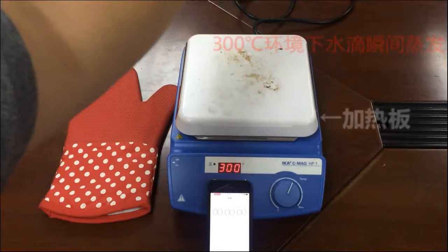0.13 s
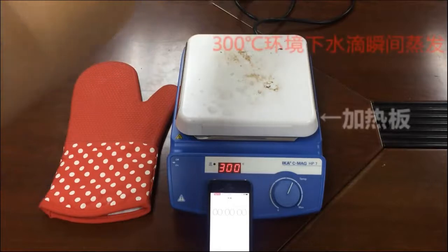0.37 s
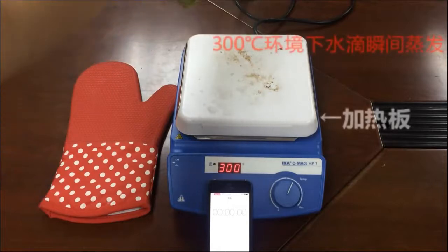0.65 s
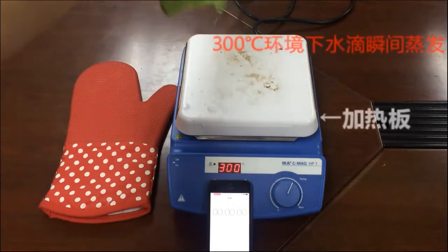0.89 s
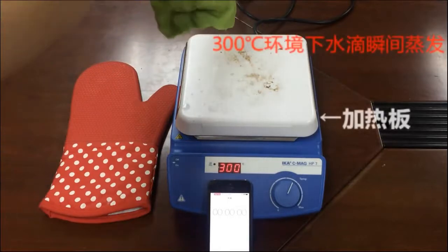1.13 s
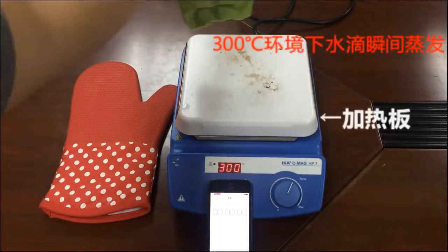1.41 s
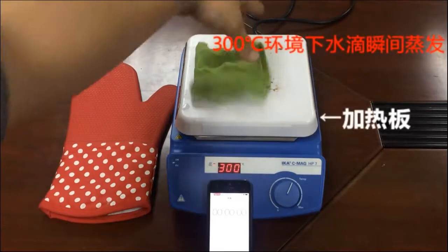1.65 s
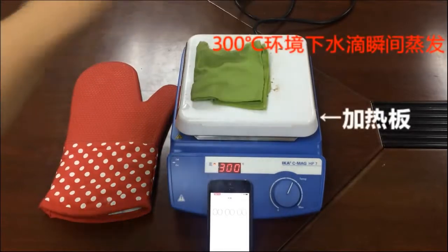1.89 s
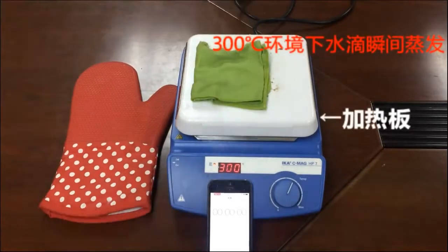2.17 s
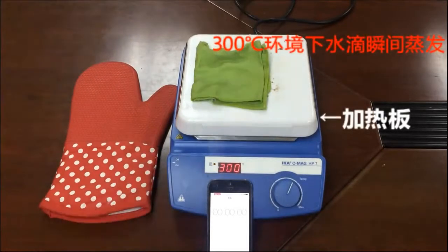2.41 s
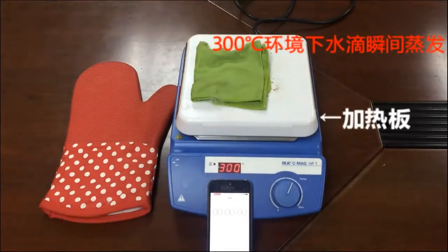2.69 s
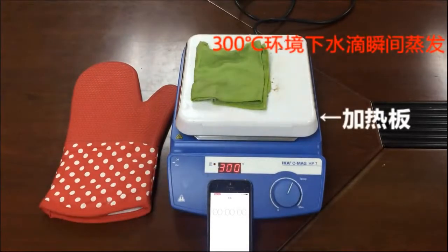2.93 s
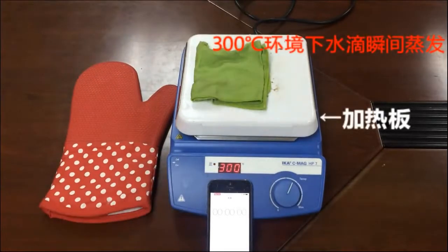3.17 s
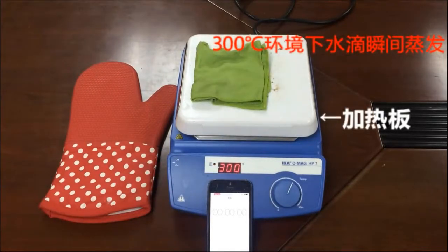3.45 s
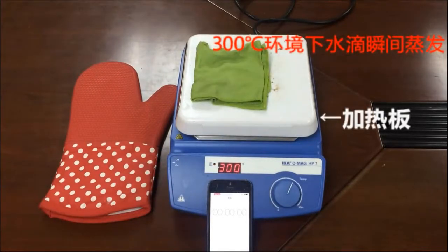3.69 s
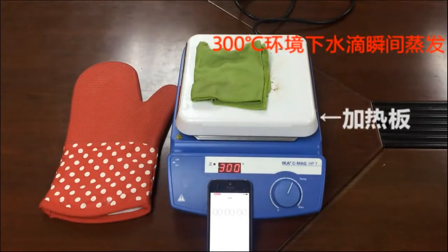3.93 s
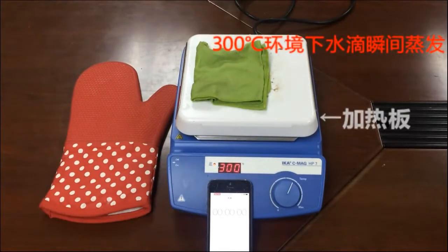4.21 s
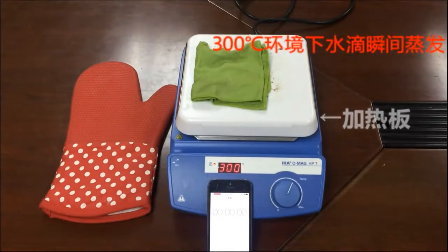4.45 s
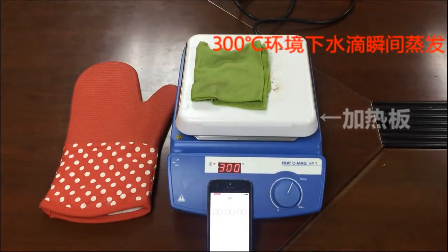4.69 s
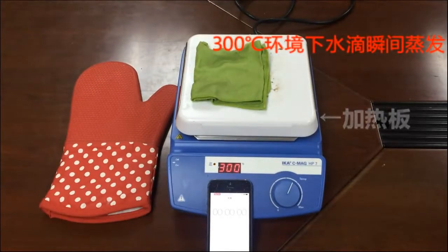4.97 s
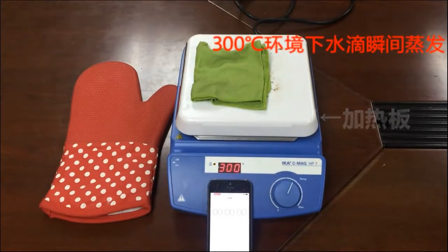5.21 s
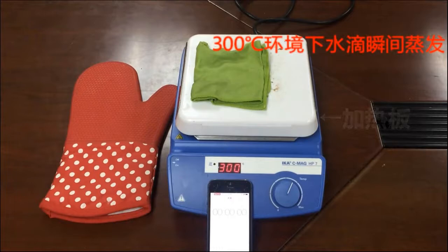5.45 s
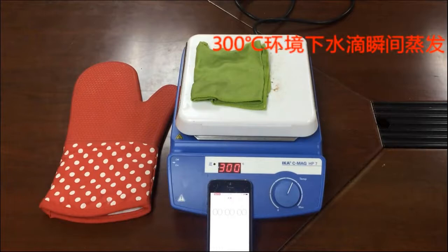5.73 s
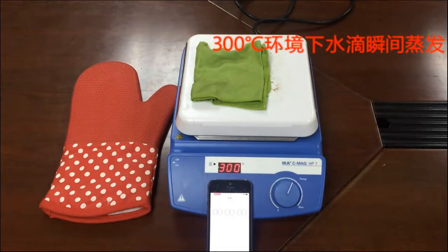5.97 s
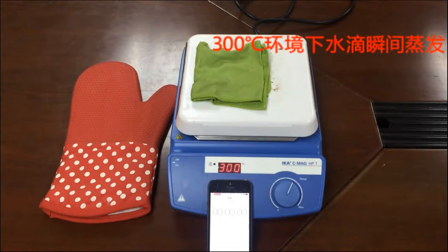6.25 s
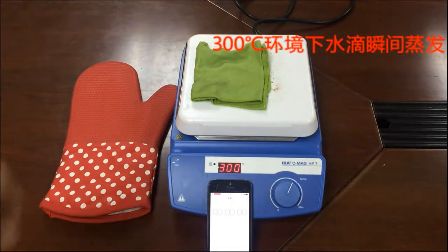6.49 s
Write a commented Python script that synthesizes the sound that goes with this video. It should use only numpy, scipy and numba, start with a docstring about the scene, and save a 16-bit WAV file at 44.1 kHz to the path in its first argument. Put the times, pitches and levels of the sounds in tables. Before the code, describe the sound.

A brief quiet moment, then a tick and a rush of sizzling as water drops boil on very hot metal, fading over a second and a half. A wet cloth plops down softly; steam seethes under it, smooth and dense at first, then grainier, with irregular dry pops and snaps. Early low rumbling and dull rustling come and go. Small indoor space, close phone microphone, slightly dull top, almost mono.

```python
"""Drops of water sizzle away on a very hot plate; then a wet cloth slaps down and seethes, slowly calming.
Thousands of tiny steam pockets burst each second as short noise puffs, larger ones ring, a few spit loudly.
The landing cloth rings decaying plate modes. A wavering sine is the heater's hum; bands of noise make a
low rumble, a drone and a rustle that come and go early on. A phone listens in a quiet room."""
import sys
import numpy as np
from scipy import signal
from scipy.fft import rfft, irfft, next_fast_len
from scipy.io import wavfile
from scipy.ndimage import uniform_filter1d
from numba import njit

SR = 44100
rng = np.random.default_rng(int(sys.argv[2]) if len(sys.argv) > 2 else 0)


def linear_from_db(decibels):
    """Turn decibels (scalar or array-like) into linear amplitude factors; 0 gives 1."""
    return 10 ** (np.asarray(decibels, float) / 20)


def output_pcm(signal):
    """Save a mono or channel-first signal as 16-bit PCM at the path in sys.argv[1].

    Samples are clipped to [-1, 1] before scaling.
    """
    pcm = np.clip(np.atleast_2d(signal).T, -1, 1) * 32767
    wavfile.write(sys.argv[1], SR, np.round(pcm).astype(np.int16))


N = 291501
T = np.arange(N) / SR
ROOM_SCATTER = rng.standard_normal(8192)  # one random echo pattern, shared by all that crosses the room

# vigour of the boiling under the cloth, as the level of its finest fizz: time_s, fizz_db
CLOTH_VIGOUR = [(1.812, -50), (1.83, -46), (1.857, -43.5), (1.872, -36.5), (1.89, -37.5), (1.905, -33.5),
                (1.925, -37.5), (1.96, -36), (2.02, -36.5), (2.3, -38.5), (2.6, -40), (3.05, -41.5),
                (3.5, -43.5), (4.15, -45), (4.35, -44.5), (5, -46), (5.45, -46.5), (5.8, -46.5), (6.1, -47),
                (6.6, -47)]


def unit(x, part=slice(None)):
    """Normalization: scale to rms 1 over a part."""
    return x / np.sqrt(np.mean(x[part] ** 2))


def band(x, lo_hz, hi_hz, order=2):
    """Butterworth band-pass: maximally flat between its edges."""
    return signal.sosfilt(signal.butter(order, [lo_hz, hi_hz], "band", fs=SR, output="sos"), x)


def colour(x, points, size=2048):
    """Minimum-phase filter: folding the cepstrum makes the given gains (hz, gain_db) causal."""
    hz, gain_db = np.transpose(points)
    bin_hz = np.arange(size // 2 + 1) * SR / size
    gain = linear_from_db(np.interp(np.log(bin_hz + 1), np.log(hz), gain_db))
    cepstrum = irfft(np.log(gain))
    cepstrum[1:size // 2] *= 2
    cepstrum[size // 2 + 1:] = 0
    impulse = irfft(np.exp(rfft(cepstrum)))
    return signal.fftconvolve(x, impulse)[:N]


def slice_of(x, lo_hz, hi_hz):
    """Complementary crossover: soft sine-squared edges let neighbouring bands add up flat."""
    size = next_fast_len(N)
    octave = np.log2(np.arange(size // 2 + 1) * SR / size + 1)

    def rise(hz):
        position = np.clip(.5 + (octave - np.log2(hz)) / .4, 0, 1)  # edge 0.4 octave wide
        return np.sin(np.pi / 2 * position) ** 2

    return irfft(rfft(x, size) * (rise(lo_hz) - rise(hi_hz)), size)[:N]


@njit
def ring(x, centre_hz, width):
    """State-variable resonator: band-pass with a moving centre, gain 1 there; width is a share of its pitch."""
    out, band_state, low_state = np.empty(len(x)), 0., 0.
    for i in range(len(x)):
        g = np.tan(np.pi * centre_hz[i] / SR)
        v = (band_state + g * (x[i] - low_state)) / (1 + g * (g + width))
        band_state = 2 * v - band_state
        low_state += 2 * g * v
        out[i] = width * v
    return out


def walk(rate):
    """Smoothed random steps: levels held 1 / rate s, averaged twice, scaled to rms 1."""
    hold = int(SR / rate)
    steps = np.repeat(rng.standard_normal(N // hold + 1), hold)
    slewed = uniform_filter1d(uniform_filter1d(steps, hold), hold)
    return unit(slewed[:N])


def even(x, share):
    """Envelope division: irons out part of the beating of band noise."""
    envelope = np.abs(signal.hilbert(x, next_fast_len(N))[:N])
    return unit(x / (envelope + 0.12 * envelope.mean()) ** share)


def travel(x):
    """Interference and reverberation: desk and plate echoes shape narrow bands; the room adds a short tail."""
    # echoes that cancel or lift narrow bands on the way to the phone: centre_hz, width_hz, gain_db
    path_bands = [(724, 16.6, -15), (908, 16, -2), (964, 65, 4), (1031, 31, -4.5), (1320, 89, 3.5),
                  (1540, 34, -6), (1653, 110, 2.5), (1946, 170, 0.5), (2037, 61, -5), (2310, 72, -5),
                  (4925, 180, -4.5), (7580, 2150, -4.5), (10540, 1420, -6.5)]
    hz = np.geomspace(300, 16000, 900)
    gain_db = sum(peak_db / (1 + (2 * (hz - centre) / width) ** 2) for centre, width, peak_db in path_bands)

    room_db, t60_s, top_hz = -12.5, 0.058, 3040
    t = np.arange(8192) / SR
    tail = band(ROOM_SCATTER, 160, top_hz, order=1) * np.exp(-np.log(1000) * t / t60_s) * (t > .002)
    gain = np.sqrt(np.mean(np.abs(rfft(tail)[40:400]) ** 2))  # rms gain from about 215 to 2150 Hz
    tail = linear_from_db(room_db) * tail / gain
    tail[0] = 1  # direct sound
    return signal.fftconvolve(colour(x, np.transpose([hz, gain_db]), size=8192), tail)[:N]


def hum():
    """Frequency modulation: the heater hums as a sine near twice the mains rate, wavering slightly."""
    hz = 101.7 + .5 * walk(8.6)
    level_db = -58 + .5 * walk(3.2)
    return np.sqrt(2) * np.sin(2 * np.pi * np.cumsum(hz) / SR) * linear_from_db(level_db)


def rumble():
    """Amplitude-modulated band noise: a rumble in two depths comes and goes."""
    # level of the two depths: time_s, upper_db, deep_db
    rumble_levels = [(0, -49, -47.5), (.15, -58, -57), (.27, -57, -64), (.34, -41, -47), (.45, -45.5, -54),
                     (.65, -47.5, -51), (.75, -52, -63), (.87, -51, -52), (1.05, -55, -51),
                     (1.15, -50, -59), (1.3, -57, -57), (1.45, -48, -63), (1.55, -63, -55),
                     (1.65, -49.5, -62), (1.8, -64, -60), (2.05, -58, -65), (2.15, -58, -56),
                     (2.25, -51.5, -60), (2.45, -49, -61), (2.63, -53.5, -51), (2.75, -60, -65),
                     (3.05, -60, -71), (3.15, -56.5, -71), (3.23, -49, -53), (3.36, -44.5, -68),
                     (3.45, -55, -68), (3.55, -58, -63), (3.75, -62.5, -77), (6.6, -63, -70.5)]
    time_s, upper_db, deep_db = np.transpose(rumble_levels)
    upper = even(band(rng.standard_normal(N), 80.5, 106.7), 0.45)
    deep = even(band(rng.standard_normal(N), 43.3, 65, order=3), 0.66)
    return linear_from_db(np.interp(T, time_s, upper_db)) * upper + linear_from_db(np.interp(T, time_s, deep_db)) * deep


def drone_and_rustle():
    """Resonant filtering of noise: a narrow drone in a wider bed, and a dull rustle of moving pitch above it."""
    # level of both: time_s, drone_db, rustle_db
    drone_levels = [(0, -71, -66), (.15, -62, -63.5), (.27, -61, -69), (.35, -58, -59), (.45, -60.5, -56),
                    (.65, -55, -62.5), (.75, -57, -64), (.85, -49.5, -67), (.95, -55.5, -58.5),
                    (1.05, -58, -65.5), (1.17, -56.5, -59), (1.4, -56, -62), (1.55, -51, -65),
                    (1.65, -54, -61), (1.82, -57, -56), (2.0, -56.5, -62), (2.15, -57, -61.5),
                    (2.33, -52.5, -57), (2.45, -53.5, -56.5), (2.64, -62.5, -65.5), (2.85, -64.5, -66.5),
                    (2.95, -63, -64), (3.05, -70, -77), (3.22, -59, -67), (3.35, -62.5, -74.5),
                    (3.55, -69.5, -68.5), (3.68, -67.5, -66.5), (4, -67, -70), (5, -68, -69.5),
                    (6.6, -69, -69.5)]
    # pitch of the rustle: time_s, pitch_hz
    rustle_pitch = [(0, 278), (.5, 292), (1.2, 252), (1.45, 277), (1.8, 265), (2.1, 303), (2.42, 350),
                    (2.7, 298), (6.6, 297)]
    time_s, drone_db, rustle_db = np.transpose(drone_levels)
    drone_db, rustle_db = np.interp(T, time_s, drone_db), np.interp(T, time_s, rustle_db)

    # the narrow drone sinks into its wider bed when it is faint
    drone_hz = 176.9
    narrow = even(band(rng.standard_normal(N), drone_hz - 5, drone_hz + 5), .6)
    narrow = narrow * linear_from_db(np.minimum(drone_db + 60, 0))
    bed = unit(band(rng.standard_normal(N), 130, 206))
    drone = 0.56 * narrow + 0.92 * bed

    pitch_hz = np.interp(T, *np.transpose(rustle_pitch))
    rustle = unit(ring(ring(rng.standard_normal(N), pitch_hz, 0.52), pitch_hz, 0.52))
    return linear_from_db(drone_db + 1.0 * walk(15)) * drone + linear_from_db(rustle_db + 1.37 * walk(12)) * rustle


def slap():
    """Modal synthesis: soft pushes of the wet cloth ring the plate's decaying modes briefly."""
    # pushes of the landing cloth: start_s, peak_db
    pushes = [(1.897, -37.5), (1.9, -27.5), (1.907, -29)]
    # modes of the plate: pitch_hz, level_db (relative), t60_s
    plate_modes = [(130, 5, 0.06), (187, 5, 0.043), (252, -10, 0.043), (332, -13, 0.025), (492, 0, 0.15),
                   (1270, 14.5, 0.0095)]
    out, t = np.zeros(N), np.arange(8192) / SR
    thud = sum(linear_from_db(level_db) * np.sin(2 * np.pi * hz * t) * np.exp(-np.log(1000) * t / t60_s)
               for hz, level_db, t60_s in plate_modes)
    thud = thud / np.abs(thud).max()
    for start_s, peak_db in pushes:
        start = int(start_s * SR)
        out[start:start + 8192] += linear_from_db(peak_db) * thud
    return out


def faint_spits(count=110):
    """Random point process: faint spits after the cloth has settled, thinning out as it calms."""
    from_s, thinning, over_fizz_db, spread_db = 2.4, 1.4, 16.5, 2.2
    when = from_s + rng.random(count) ** thinning * (T[-256] - from_s)
    fizz_db = np.interp(when, *np.transpose(CLOTH_VIGOUR))
    level_db = fizz_db + over_fizz_db + spread_db * rng.standard_normal(count)
    pitch_hz = 7000 * 2 ** (.45 * rng.standard_normal(count))  # spread in octaves
    length_ms = np.full(count, .06)
    return np.transpose([when, level_db, pitch_hz, length_ms])


def spits():
    """Impulsive radiation: a bursting pocket is a click of tone and noise that swells and dies at once."""
    # loud spits, peak before band-pass and path: start_s, peak_db, pitch_hz, length_ms (rise and decay constant)
    loud_spits = [(0.1016, -29, 9000, 0.22), (0.1024, -22, 5540, 0.26), (0.1034, -36, 9400, 0.18),
                  (0.8174, -26, 6000, .07), (1.1, -29, 6000, .07), (1.3113, -23, 6000, .07),
                  (1.697, -17.5, 3500, 0.087), (1.87, -17, 4400, 0.11), (1.901, -22, 8200, .07),
                  (1.907, -20, 5500, .06), (2.5878, -26, 6000, 0.064), (2.6332, -19, 6000, 0.076),
                  (2.7562, -23, 8000, .07), (2.8216, -20, 6000, .07), (2.8468, -18, 8000, .07),
                  (3.009, -20, 6000, 0.054), (3.0694, -15, 6400, .09), (3.1624, -18, 9000, 0.089),
                  (3.189, -22, 2500, .2), (3.2202, -15, 6000, 0.079), (3.3561, -16, 6000, 0.054),
                  (3.4218, -15.5, 7760, .08), (3.5332, -21, 4200, 0.25), (3.5478, -17, 3000, .05),
                  (3.5699, -18, 6500, 0.055), (3.5978, -19, 2500, .08), (3.6568, -15, 11100, 0.35),
                  (3.6606, -27, 2800, 0.055), (3.7743, -17, 7400, .07), (3.8522, -23, 6000, 0.085),
                  (3.9198, -12.5, 6000, .07), (3.946, -17, 3500, 0.071), (3.9722, -18, 6900, 0.091),
                  (4.2213, -14, 10000, 0.1), (4.3157, -17, 7000, .06), (4.3313, -15, 5930, 0.095),
                  (4.3708, -16, 6500, 0.084), (4.5202, -28, 8400, .06), (4.8339, -23.5, 5200, 0.067),
                  (4.8676, -21, 4630, .3), (4.9104, -23, 5500, .2), (5.2538, -29, 5000, 0.048),
                  (5.33, -18.5, 10000, .08), (5.6197, -26, 3900, 0.07), (5.8281, -24, 6000, .07),
                  (5.8881, -22.5, 7800, .12), (5.9355, -23, 6000, 0.046), (6.3313, -24, 3840, .08)]
    out, t = np.zeros(N), np.arange(256) / SR
    for start_s, peak_db, pitch_hz, length_ms in np.vstack([loud_spits, faint_spits()]):
        pop = np.sin(2 * np.pi * pitch_hz * t) + 1.5 * rng.standard_normal(256)
        pop = pop * t * np.exp(-t * 1e3 / length_ms)
        start = int(start_s * SR)
        out[start:start + 256] += linear_from_db(peak_db) * pop / np.abs(pop).max()
    return travel(band(out, 3100, 20000, order=1))


def bursts(rate, spread_db, length_s):
    """Shot noise: steam pockets burst at random as short puffs, many small and a few large."""
    hit = rng.random(N) < rate / SR
    size_db = spread_db * np.minimum(rng.exponential(size=N), 5.5)
    keep = np.exp(-1 / (length_s * SR))
    envelope = signal.lfilter([1], [1, -keep], hit * linear_from_db(size_db))
    return unit(envelope * rng.standard_normal(N))


def ringing_pockets():
    """Size sets pitch: half-octave bands of bursts; the lower the pitch, the rarer and longer they are."""
    out = 0
    for hz in 420 * 2 ** np.arange(0, 5.1, .5):
        pocket = band(bursts(150 + .08 * hz, 2.3, 2.0 / hz), hz / 1.253, hz * 1.213)
        out = out + unit(pocket) * np.sqrt(hz / 26000)
    return out


def boil(vigour, lands_s, wets_s, growth, steepness, tint, rate, spread_db, pocket_db, smooth_db,
         flicker_db, patchy_db):
    """Nucleate boiling: snaps, ringing pockets and smooth steam, levelled by pocket size as pockets grow."""
    # borders between pocket sizes, from small to large: edge_hz
    size_edges = (16000, 4600, 3400, 2400, 1500, 950, 400)
    time_s, fizz_db = np.transpose(vigour)
    part = slice(int(time_s[0] * SR), int(time_s[-1] * SR))
    fizz_db = np.interp(T, time_s, fizz_db)
    since = np.maximum(T - lands_s, 0)
    wet = np.minimum(since / wets_s, 1) ** 2

    # bigger pockets need time to grow after water lands
    over_db = [0]
    for before, grown, lack, grow_s, drift in growth:
        after = grown - lack * np.exp(-(since / grow_s) ** steepness) + drift * since
        over_db.append(before + wet * (after - before))

    # the snaps are too short to hold much bass
    snaps = unit(band(bursts(rate, spread_db, .0001), 6900, 21400, order=1))
    # the fresh boil is too dense to crackle: snaps and pockets start 5 dB down and clear up over 0.5 s
    crackle = (snaps + linear_from_db(pocket_db) * ringing_pockets()) * linear_from_db(-5 * np.exp(-since / .5))
    steam = crackle + linear_from_db(smooth_db) * rng.standard_normal(N)
    steam = travel(colour(steam, tint))

    # all sizes flicker together, and each wanders on its own
    flicker, out = flicker_db * walk(13) + 0.5 * walk(90), 0
    for k, db in enumerate(over_db):
        share = unit(slice_of(steam, size_edges[k + 1], size_edges[k]), part)
        out = out + share * linear_from_db(fizz_db + db + flicker * 1.08 ** k + patchy_db * walk(8))
    return out


def cavity(x, resonance):
    """Cavity resonance: a widening steam space sinks in pitch, lifting or dipping one band of the boil."""
    time_s, centre_hz, lift_db = np.transpose(resonance)
    lift = linear_from_db(np.interp(T, time_s, lift_db)) - 1
    return x + lift * ring(x, np.interp(T, time_s, centre_hz), 0.27)


def drops_boil():
    """Boiling on bare metal: the landed drop sizzles above a growing steam cushion."""
    # vigour as the level of the finest fizz: time_s, fizz_db
    drop_vigour = [(0, -55), (0.03, -47), (0.06, -48.5), (0.1008, -50.5), (0.1018, -39), (0.107, -34.5),
                   (0.111, -32.5), (0.12, -32.5), (0.145, -33.5), (0.165, -31), (0.2, -34), (0.33, -37.5),
                   (0.45, -39), (0.6, -41), (0.78, -42), (0.88, -42.5), (1.3, -43.5), (1.4, -46.5),
                   (1.5, -44.5), (1.6, -47), (1.7, -47), (1.78, -48), (1.82, -52)]
    # level over the fizz, small to large pockets: before_db, grown_db, lack_at_landing_db, grow_s, drift_db_per_s
    drop_growth = [(-6.5, -6.5, 11, 0.042, -0.9), (-13.5, -5.5, 22, 0.079, -3),
                   (-8, -6.5, 18.5, 0.095, -3.5), (-12, -7, 25, 0.071, -5), (-11.5, -15, 36, 0.024, -4.5)]
    # colour of the steam on the bare plate: hz, gain_db
    drop_colour = [(240, -55), (400, -28), (508, -13.5), (1020, -7), (1270, -3), (2270, -9), (2970, -9),
                   (4220, -4.5), (9580, -2), (10600, -4), (11700, -3), (15200, -61), (22000, -120)]
    # resonance of the steam cushion: time_s, centre_hz, lift_db
    drop_cushion = [(.1, 10000, 6.5), (.14, 9200, -0.5), (.17, 5600, -0.5), (.22, 3600, 0),
                    (.33, 3260, 0.5), (.9, 3000, 1.5), (1.2, 2800, -3)]
    steam = boil(drop_vigour, lands_s=0.1015, wets_s=.001, growth=drop_growth, steepness=0.5, tint=drop_colour,
                 rate=4000, spread_db=2.4, pocket_db=-5.0, smooth_db=5.1, flicker_db=0.7, patchy_db=.5)
    return cavity(steam, drop_cushion)


def cloth_boil():
    """Boiling under a cover: the wet cloth seethes over a widening steam space and slowly calms."""
    # level over the fizz, small to large pockets: before_db, grown_db, lack_at_landing_db, grow_s, drift_db_per_s
    cloth_growth = [(-7, -6.5, 0, 0.11, -0.27), (-13, -8, 5.5, 0.13, 0.33), (-15, -4.5, 6, 0.23, 0.19),
                    (-12.5, -8, 9, 0.25, 0.4), (-19, -14.5, 8.5, 0.69, 0.21)]
    # colour of the steam through the cloth: hz, gain_db
    cloth_colour = [(240, -47), (400, -35), (569, -25), (674, -11.5), (960, -8), (1040, -9.5), (1150, -5.5),
                    (1270, -4.5), (1640, -4), (2300, -3.5), (4930, -9), (5600, -9), (11700, -8),
                    (15200, -42), (22000, -120)]
    # resonance of the steam space under the cloth: time_s, centre_hz, lift_db
    cloth_space = [(1.82, 5600, 5), (1.88, 4370, 2.5), (1.95, 4000, -4), (2.04, 3450, 2), (2.12, 2460, 1.5),
                   (2.22, 1870, 3.5), (2.36, 1470, 1), (2.6, 1300, -2.5)]
    steam = boil(CLOTH_VIGOUR, lands_s=1.845, wets_s=.03, growth=cloth_growth, steepness=2.5, tint=cloth_colour,
                 rate=3000, spread_db=2.9, pocket_db=-3.0, smooth_db=5.6, flicker_db=0.3, patchy_db=.35)
    return cavity(steam, cloth_space)


def scene():
    """Superposition: the layers add up, and an equal-power fade covers the last drops."""
    covered = np.clip((T - CLOTH_VIGOUR[0][0]) / .01, 0, 1)
    boiling = np.sqrt(1 - covered) * drops_boil() + np.sqrt(covered) * cloth_boil()
    mid = hum() + rumble() + drone_and_rustle() + slap() + spits() + boiling
    # a very faint shifted copy is added to one channel and taken from the other
    side = linear_from_db(-37) * band(np.roll(mid, 1500), 300, 6300)
    return np.array([mid + side, mid - side])


def top_cut(x):
    """Nothing passes above the cut-off."""
    return signal.sosfilt(signal.butter(12, 11820, fs=SR, output="sos"), x)


def record(dry):
    """Elliptic low-pass: the phone cuts the top steeply above 11900 Hz."""
    cut = signal.sosfilt(signal.ellip(12, .2, 60, 11900, fs=SR, output="sos"), dry)
    return top_cut(cut)


dry = scene()
out = record(dry)
output_pcm(out)
```